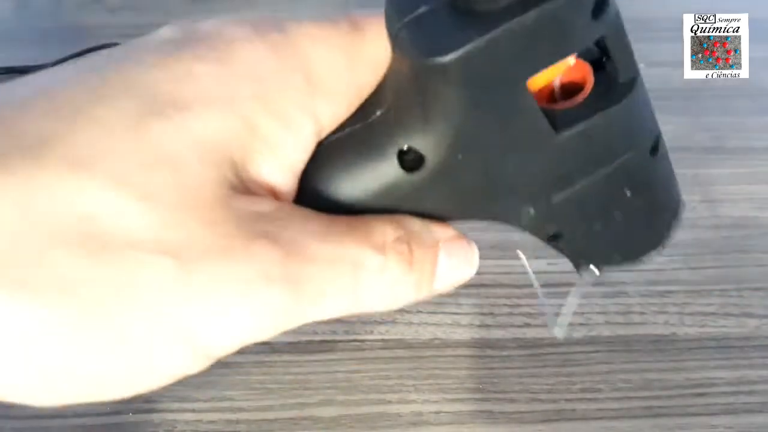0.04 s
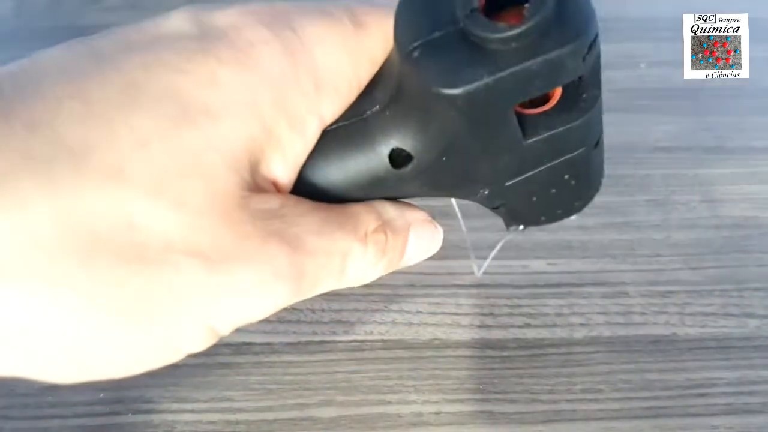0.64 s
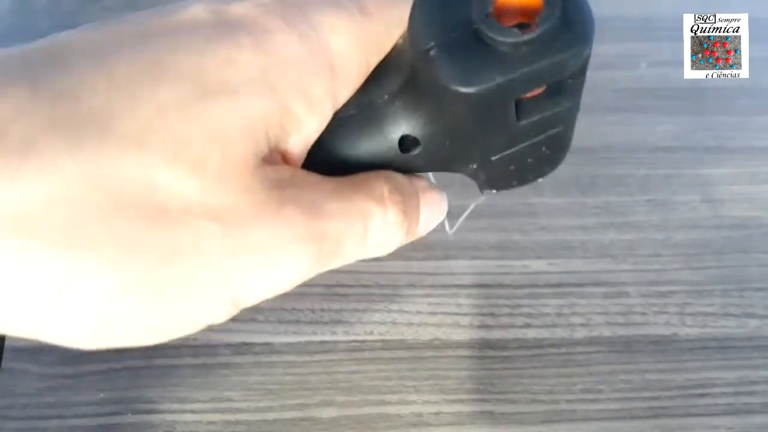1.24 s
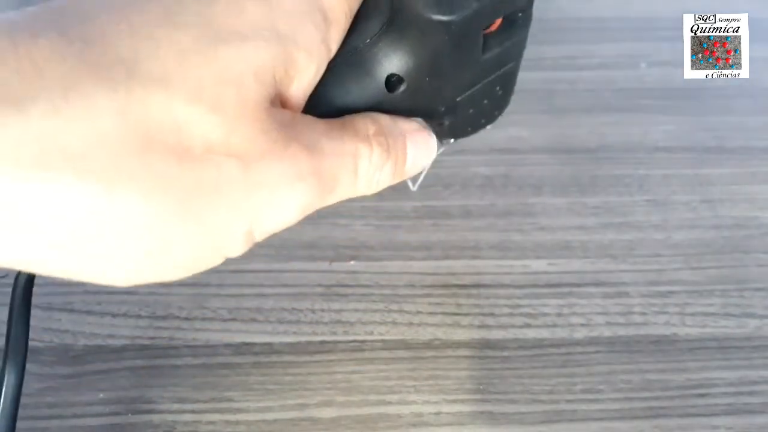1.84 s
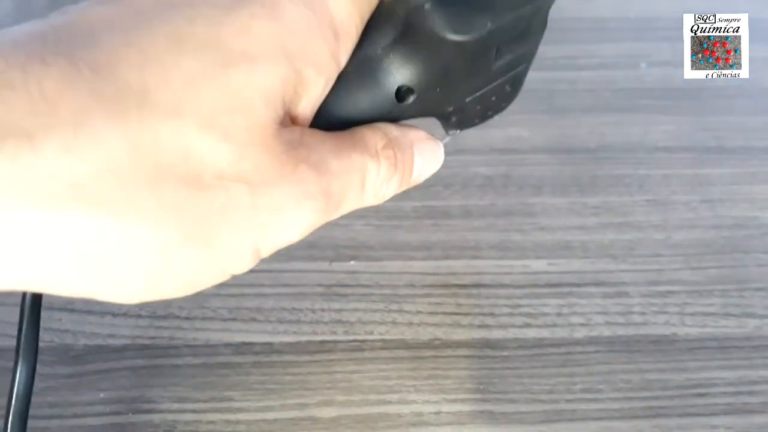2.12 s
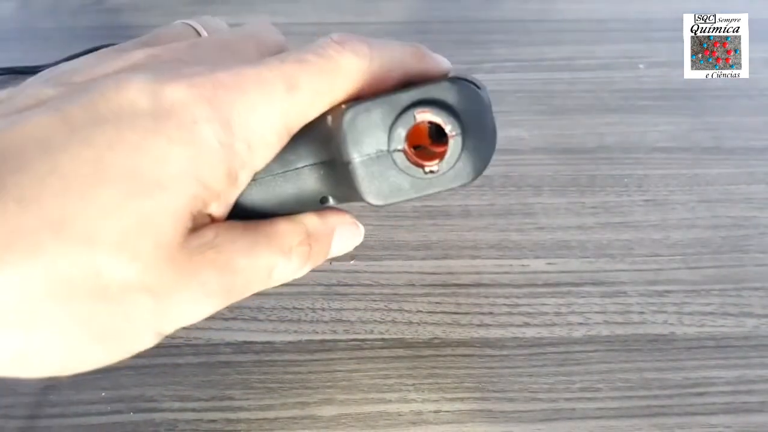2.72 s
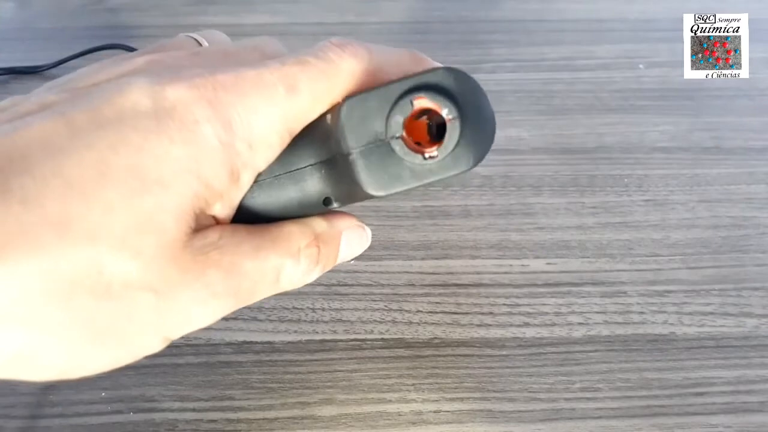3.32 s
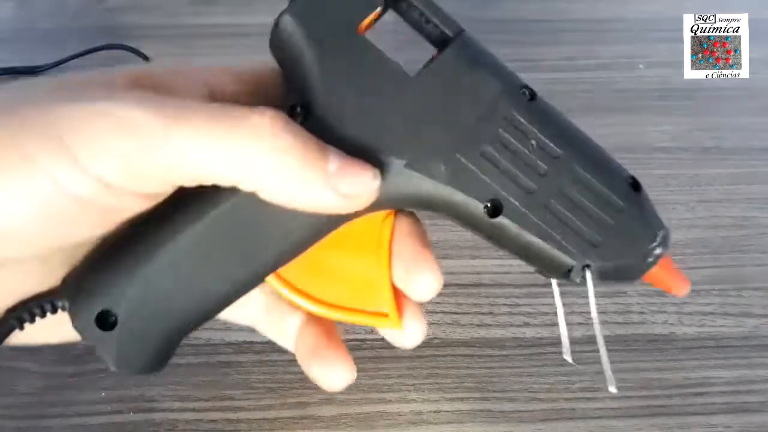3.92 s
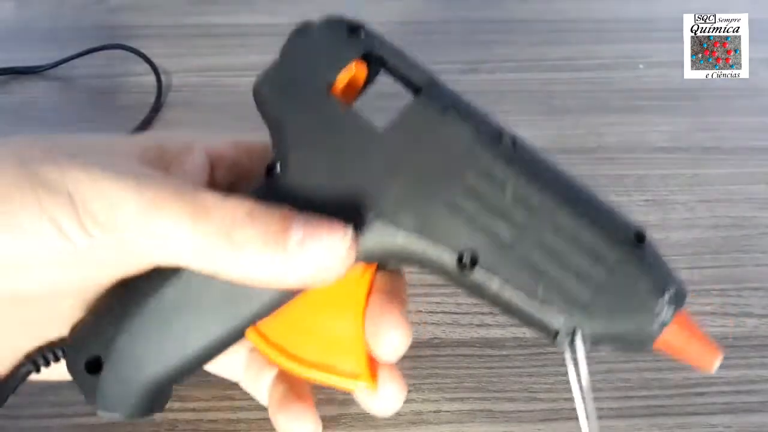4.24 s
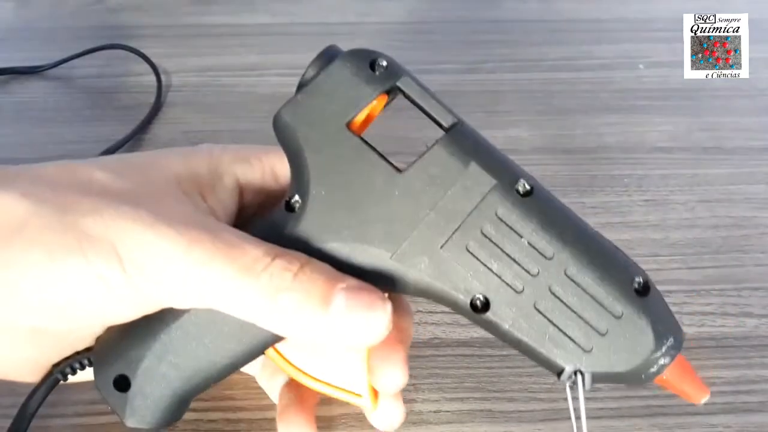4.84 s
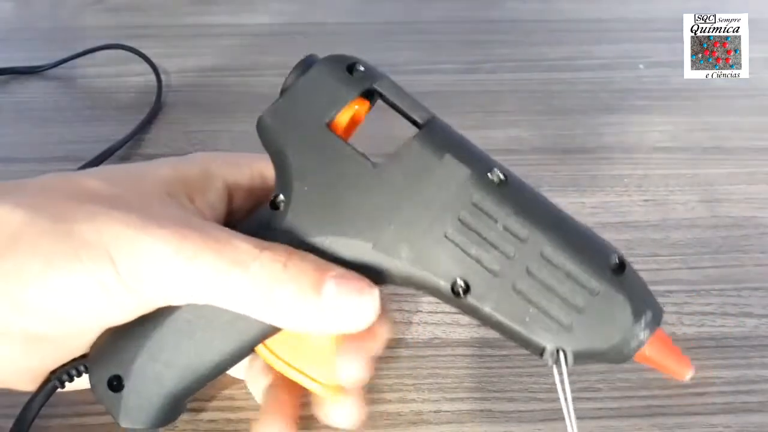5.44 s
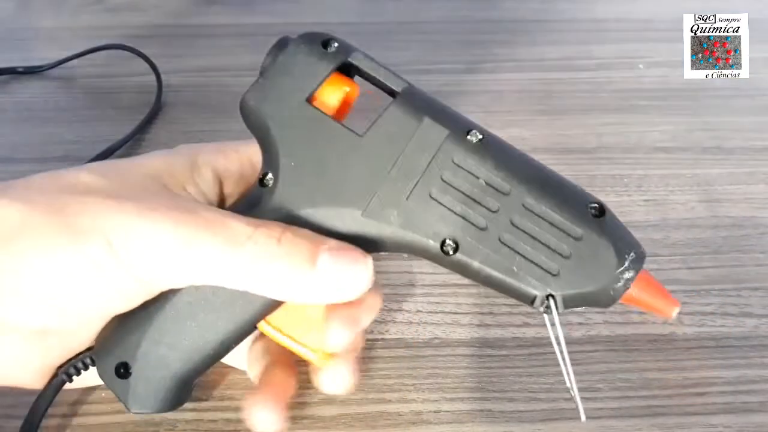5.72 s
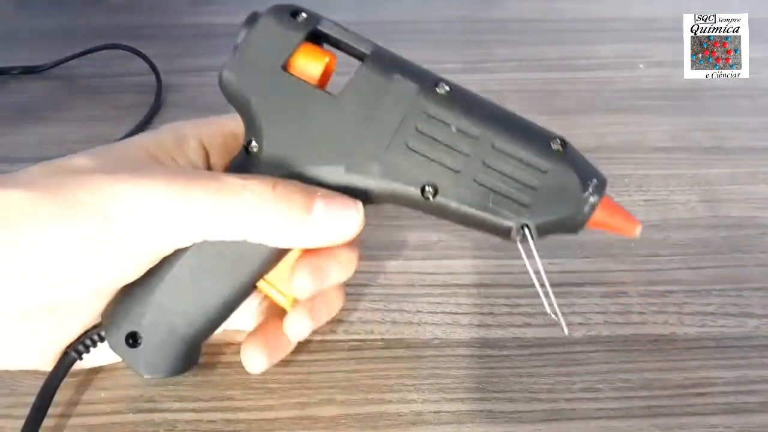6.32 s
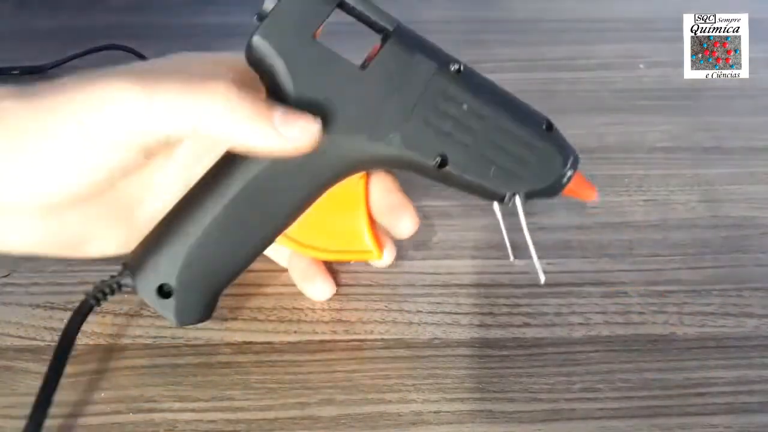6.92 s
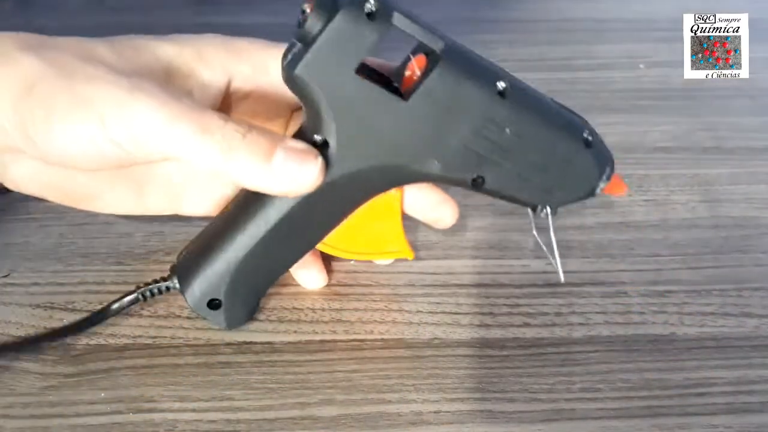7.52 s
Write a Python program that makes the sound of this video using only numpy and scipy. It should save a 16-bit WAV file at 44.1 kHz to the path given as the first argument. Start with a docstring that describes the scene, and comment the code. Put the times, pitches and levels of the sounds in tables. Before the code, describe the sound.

Close, hollow plastic scrapes and clicks from a glue gun trigger grow busier, ending in knocks and thuds on a wooden table.

```python
"""A plastic glue gun is worked close to the microphone in a small room, over a faint rumble.
Up to 6.7 s each squeeze and release scrapes the feed slider through the hollow shell, and the linkage
clacks at its stops. From 4.5 s the strokes crowd together, with more trigger cracks and spring pings.
From 6.9 s the gun is set down on a wooden table: it knocks, thumps hollowly, drags and thuds."""
import sys
import numpy as np
from scipy import signal
from scipy.fft import rfft, irfft, next_fast_len
from scipy.io import wavfile
from scipy.ndimage import uniform_filter1d

SR = 44100
rng = np.random.default_rng(int(sys.argv[2]) if len(sys.argv) > 2 else 0)


def transcribe(signal):
    """Save signal, clipped to [-1, 1], as a 16-bit WAV file at the path in sys.argv[1]."""
    frames = np.atleast_2d(signal).T
    limited = np.clip(frames, -1, 1)
    pcm = np.round(limited * 32767).astype(np.int16)
    wavfile.write(sys.argv[1], SR, pcm)


N = 337806

# All table levels are relative; gains follow.
# room noise spectrum: f/Hz, level/dB
NOISE_SPECTRUM = [(15, -49), (25, -11), (54, -2), (86, 1), (120, 1.5), (176, -7), (572, -18), (617, -18),
                  (720, -16.5), (1230, -22), (1520, -24), (1770, -24), (5300, -26.5), (6700, -32.5),
                  (8800, -33), (9610, -32), (11500, -49), (15000, -88), (22000, -120)]
# room noise, side over mid: f/Hz, gain/dB
NOISE_SIDE = [(60, -21.5), (170, -16), (490, -12), (1390, -7), (3980, -5), (11400, 1.5)]
# room reverberation: f/Hz, T60/s, gain/dB
REVERB = [(60, 0.39, -25), (137, 0.48, -14), (330, 0.52, -2.5), (780, 0.31, -2.5), (1850, 0.29, 3),
          (4640, 0.28, 1.5), (9400, 0.27, 0)]
# reverberation, side over mid: f/Hz, gain/dB
REVERB_SIDE = [(100, -43), (600, -18), (1400, -16), (2800, -12), (5500, -6), (9000, -4)]
# microphone response: f/Hz, gain/dB
MIC_RESPONSE = [(20, -5), (50, 0), (6500, 0), (8000, 1), (8800, 1), (9300, -2), (10000, -6), (11500, -10)]

# table top with the gun on it: f/Hz, width/Hz, level/dB
TABLE_MODES = [(90, 2.3, 0), (145.3, 15.7, 6), (176, 9.8, -14), (295, 9.5, -13.5), (346, 32, -8.5),
               (437, 140, -9), (517, 320, -16.5), (662, 80, -9), (810, 130, -19.5), (967, 150, -7),
               (1234, 220, -4), (1390, 310, -14.5), (1740, 830, -9.5), (1990, 250, -46), (2450, 290, -34),
               (3040, 250, -66), (4000, 1170, -15.5), (5800, 540, -34), (8060, 500, -35)]
# edges of its boom, thud, knock and click bands: f/Hz
TABLE_EDGES_HZ = [70, 240, 900, 3000, 9300]
# hand, cord and stand dragging on the table: peak t/s, length/s, level/dB, tilt/dB
RUBS = [(2.46, 0.058, -70.5, -3), (3.72, 0.1, -68.5, -3.5), (5.035, 0.035, -60.5, -7.5),
        (6.85, 0.95, -79.5, 19), (7.02, 0.16, -60, 6.5), (7.165, 0.32, -51.5, -2),
        (7.425, 0.21, -48.5, -3.5), (7.454, 0.018, -42.5, 4.5), (7.62, 0.71, -56.5, -3.5)]
# blows on the table: t/s, level/dB, tilt/dB, extra thud/dB, extra click/dB
KNOCKS = [(6.9516, -37, 1, -14, 5), (6.9859, -37.5, 2.5, 0, -3), (7.0207, -51, 5, -13, -5),
          (7.0488, -49.5, -3.5, -12, -12), (7.0697, -43, -3, -4, -1), (7.1254, -60, -1, -6, -8),
          (7.1426, -48.5, 2, -15, 3.5), (7.163, -45, 3.5, -7, 0), (7.3241, -39, -5, 13.5, 7),
          (7.3464, -46, -6, 8, 6.5), (7.499, -28, 0, 7.5, 2.5), (7.535, -49.5, 1, 17.5, -7),
          (7.558, -43.5, -2.5, 2, -6)]
# hollow thump of the gun landing flat, ringing in table and room: f/Hz, width/Hz, level/dB
THUMP_MODES = [(277, 20, -12), (328, 21, -1.5), (373, 44, 1), (406.5, 14.4, -5), (480, 23, -2.5),
               (541, 23, -1), (615, 60, -4.5), (693, 25, 1), (744, 18, -1), (811, 25, -4), (1096, 27, -18),
               (1370, 110, -9)]
# gun landing flat: t/s, level/dB
THUMPS = [(7.324, -27), (7.3464, -33)]

# gun shell: f/Hz, width/Hz, level/dB
SHELL_MODES = [(650, 21, -17), (825, 118, 18.5), (800, 93, 11), (1019, 85, 8.5), (1220, 220, -4),
               (1900, 300, 1), (2060, 640, -2.5), (2450, 1500, -2.5), (3040, 130, -3.5), (3550, 850, -3.5),
               (4600, 450, -22.5), (5160, 5400, -21.5), (7120, 420, -15), (7260, 950, -6.5),
               (7760, 750, -1.5), (8750, 200, -34)]
# edges of its body, rasp and hiss bands: f/Hz
SHELL_EDGES_HZ = [560, 1450, 5500, 10800]
# rubbing contacts singing in one resonance: centre t/s, length/s, f/Hz, width/Hz, level/dB
FRICTION_TONES = [(0.06, 0.049, 780, 170, -58.5), (0.146, 0.075, 2200, 800, -62.5),
                  (0.278, 0.019, 800, 40.3, -47.5), (0.282, 0.067, 7790, 700, -64),
                  (0.641, 0.062, 1947, 590, -59), (0.86, 0.075, 845, 90, -61.5),
                  (1.129, 0.13, 1170, 60, -77), (1.31, 0.13, 2426, 300, -66.5),
                  (1.575, 0.034, 834, 45, -49.5), (1.65, 0.15, 825, 90, -68), (2.151, 0.083, 684, 192, -63),
                  (2.7, 0.14, 810, 101, -81), (2.716, 0.095, 5810, 720, -74.5), (2.915, 0.04, 824, 60, -70),
                  (3.145, 0.12, 817, 81, -68.5), (3.149, 0.11, 5660, 600, -74),
                  (3.347, 0.12, 2450, 502, -69), (3.364, 0.041, 800, 55, -56.5),
                  (3.44, 0.11, 810, 103, -65.5), (3.679, 0.33, 910, 229, -75), (3.739, 0.12, 591, 169, -69),
                  (4.855, 0.039, 780, 90, -50), (5.044, 0.056, 218, 50, -61),
                  (5.045, 0.079, 1530, 402, -63.5), (5.19, 0.11, 829, 166, -57),
                  (5.394, 0.025, 874, 260, -54.5), (5.5, 0.063, 903, 380, -57),
                  (6.238, 0.1, 3490, 534, -65), (6.434, 0.03, 8400, 1100, -63),
                  (7.087, 0.047, 142, 30, -43.5), (7.164, 0.06, 1135, 381, -44),
                  (7.168, 0.045, 2050, 720, -59), (7.19, 0.11, 149, 50, -52.5),
                  (7.439, 0.1, 3544, 1508, -51)]
# spring: f/Hz, width/Hz, level/dB
SPRING_MODES = [(4550, 110, -9.5), (5600, 240, -9), (6500, 290, 0), (7770, 140, -7)]
# spring coming free: t/s, level/dB
PINGS = [(2.3303, -59.5), (4.8132, -53.5), (5.352, -50)]
# trigger bottoming out: t/s, level/dB, tilt/dB, extra crack/dB
SNAPS = [(0.0985, -44, -0.5, 7), (0.1072, -42.5, 3, -1), (4.4958, -38.5, 10, 1), (4.5003, -45.5, 2, 0),
         (4.5112, -42, 5, -4), (5.2358, -44.5, -5, -1.5), (5.4154, -48, -1.5, 5), (5.5608, -44.5, 0, 1),
         (5.6778, -34.5, 7, -5.5), (5.8388, -45, 4, 0), (6.2655, -33.5, 0.5, 0), (6.2692, -54, 21.5, 8.5),
         (6.3102, -45.5, 2, -4), (6.5, -37.5, -0.5, -1.5), (6.5421, -42.5, -0.5, -8),
         (6.5485, -40.5, -2.5, -2.5)]
# linkage catches, stops and rebounds: t/s, level/dB, tilt/dB, extra crack/dB
CLACKS = [(0.0525, -62.5, -7, 6.5), (0.227, -62, -2.5, 1.5), (0.622, -51.5, -1, -6), (0.633, -61.5, 1, 5),
          (0.646, -66, -3, -7), (0.7615, -60, 8, 7.5), (1.3492, -66.5, -15, -2),
          (1.4277, -60.5, -11.5, 4.5), (1.553, -63.5, -8, 4.5), (1.8735, -74, -20, 3),
          (1.9576, -62.5, -11.5, 1.5), (1.976, -66.5, -5, 5), (2.047, -69, -2, 5), (2.084, -59, 4, -7),
          (2.1009, -61.5, -9, -5), (2.125, -57, -4.5, -3), (3.1806, -63.5, -7.5, 1.5), (3.301, -74, 4, 12),
          (3.426, -53, 5, -3.5), (4.4975, -42, -5.5, -5.5), (4.5225, -54.5, 10, 8), (4.8755, -57, -10, 3),
          (4.8795, -54.5, -3, 7), (4.8875, -65, 1, -3), (4.8965, -50, -4, -6), (4.9055, -59, -8, -14),
          (4.969, -62.5, -7.5, -14), (5.1245, -61, -11, -5), (5.155, -66, -21.5, 7),
          (5.2417, -56, 7.5, 9.5), (5.3735, -53.5, -7.5, -13), (5.4088, -53, -6.5, 5), (5.421, -55, -1, 0),
          (5.5545, -52, -10, -1.5), (5.5921, -50, 2, -4), (5.8455, -52.5, -9, -1.5), (5.8585, -61, 14, -10),
          (5.8758, -59, -2, -2), (6.006, -72.5, -15, 2), (6.2132, -60.5, -5, 4.5), (6.2935, -47, 4, -22),
          (6.4207, -56.5, -4, -10), (6.461, -56.5, -2, 5), (6.504, -54, -2, -6)]
# finger-driven slider strokes: peak t/s, length/s, level/dB, tilt/dB
PUSHES = [(0.095, 0.18, -56, 2.5), (0.638, 0.16, -61, 2), (1.41, 0.17, -60, 3), (1.94, 0.18, -61.5, 4.5),
          (2.725, 0.25, -69, 6.5), (3.17, 0.17, -65, 5.5), (4.19, 0.11, -68, 4), (4.48, 0.25, -60, -2),
          (5.152, 0.049, -64.5, -13), (5.23, 0.12, -55.5, -1), (5.54, 0.2, -55.5, -1.5),
          (5.845, 0.16, -56, 1), (6.265, 0.13, -52.5, 0), (6.49, 0.22, -53.5, 3.5)]
# spring-driven slider strokes: peak t/s, length/s, level/dB, tilt/dB
RETURNS = [(0.282, 0.074, -58.5, -0.5), (0.799, 0.082, -53.5, -1.5), (1.007, 0.096, -75, -4.5),
           (1.573, 0.18, -62.5, 0), (2.105, 0.085, -58.5, 1.5), (2.346, 0.12, -72, 5),
           (2.909, 0.12, -68.5, 2.5), (3.378, 0.17, -61.5, 0), (4.854, 0.11, -57, -1.5),
           (5.383, 0.097, -53.5, -1), (5.706, 0.13, -57, -0.5), (6.57, 0.11, -58.5, 2)]
# coupling of slider and spring to the shell: f/Hz, gain/dB
SLIDER_RESPONSE = [(500, -0.5), (850, 0), (1150, 0), (1600, -7), (2000, 0), (2220, -0.5), (2480, 0.5),
                   (3000, -1.5), (3900, 1.5), (4800, 3.5), (6300, -0.5), (8200, -2.5)]

RUB_DB, KNOCK_DB = (1, 1, 0.5, -5), (4, -7, -0.5, -13)  # boom, thud, knock, click
CLACK_DB, PUSH_DB, RETURN_DB = (1.5, 0.5, -13.5), (6.5, -4, -8.5), (4.5, -1, 0)  # body, rasp, hiss


def amp(db):
    return 10 ** (np.asarray(db) / 20)


def unit_rms(x):
    return x / np.sqrt(np.mean(x ** 2) + 1e-20)


def interp_log(points, hz):
    f, value = np.transpose(points)
    return np.interp(np.log(hz + 1), np.log(f + 1), value)


def colour(x, points):
    """Filter by a curve of f/Hz, gain/dB."""
    size = next_fast_len(len(x))
    gain = amp(interp_log(points, np.fft.rfftfreq(size, 1 / SR)))
    return irfft(rfft(x, size) * gain, size)[:len(x)]


def add(mix, start_s, sound):
    part = mix[max(round(start_s * SR), 0):][:len(sound)]
    part += sound[:len(part)]


def band_levels(shape_db, level_db, tilt_db):
    """Levels in dB, low band to high; harder contact tilts towards the treble."""
    return level_db + np.array(shape_db) + tilt_db * np.linspace(-1, 1, len(shape_db))


def strokes(rows, shape_db, rise_share):
    """Rows for scrape(): peak t/s, rise/s, fall/s, band levels/dB."""
    return [(s, rise_share * length_s, (1 - rise_share) * length_s, band_levels(shape_db, db, tilt))
            for s, length_s, db, tilt in rows]


def room_noise(level_db=-68.5, waver_db=1.7):
    """Wavering rumble and faint hiss: mid, side."""
    drift = unit_rms(uniform_filter1d(uniform_filter1d(rng.standard_normal(N), 5000), 3000))
    gain = amp(level_db + waver_db * drift)
    mid, side = (gain * unit_rms(colour(rng.standard_normal(N), NOISE_SPECTRUM)) for _ in range(2))
    return mid, colour(side, NOISE_SIDE)


def reflections(onset_s=0.00036, taps_per_s=3000):
    """Room impulse response: sparse echoes build up, then decay band by band."""
    size, bands = SR // 2, np.array(REVERB)
    taps = rng.standard_normal(size) * (rng.random(size) < taps_per_s / SR)
    hz, t, spectra = signal.stft(taps, SR, nperseg=256)
    t60_s = interp_log(bands[:, :2], hz)[:, None]
    tail = signal.istft(spectra * amp(-60 * t / t60_s), SR, nperseg=256)[1][:size]
    tail *= 1 - np.exp(-(np.arange(size) / SR / onset_s) ** 2)
    return colour(tail / np.linalg.norm(tail), bands[:, ::2])


def room_reverb(x, patterns=4, cycle_s=1.4):
    """The hand moves the gun about: reflection patterns cross-fade in turn."""
    turns = np.arange(N) / SR / cycle_s + np.arange(patterns)[:, None] / patterns
    shares = np.maximum(np.cos(2 * np.pi * turns), 0)
    shares /= np.linalg.norm(shares, axis=0)
    return sum(signal.oaconvolve(x * share, reflections())[:N] for share in shares)


def tap_response(modes, edges_hz, size, vary_db, detune, phase_rad):
    """Damped modes, split into bands; each contact point weights them differently."""
    t = np.arange(size) / SR
    hz, width_hz, db = np.transpose(modes)[:, :, None]
    weight, shift, phase = rng.standard_normal((3, len(modes), 1))
    upper = hz > edges_hz[1]  # lowest band keeps pitch and phase
    angle = 2 * np.pi * hz * (1 + detune * shift * upper) * t + phase_rad * phase * upper
    envelopes = amp(db + vary_db * weight) * width_hz * np.exp(-np.pi * width_hz * t)
    tap = np.sum(envelopes * np.cos(angle), axis=0)
    return [signal.sosfilt(signal.butter(3, band_hz, "bandpass", fs=SR, output="sos"), tap)
            for band_hz in zip(edges_hz, edges_hz[1:])]


def strike(rows, body, chatter, chatter_s, rise_s, low_lag_s=0):
    """One impulse per blow; the faces then chatter, roughening the upper bands."""
    out, t = np.zeros(N), np.arange(SR // 30) / SR
    for s, levels_db in rows:
        rattle = chatter * rng.standard_normal(len(t)) * np.exp(-t / chatter_s)
        contact_s = rise_s * np.sqrt(amp(max(levels_db) - levels_db[-1]))  # dull blows rise slower
        for k, (db, band) in enumerate(zip(levels_db, body())):
            roughness = k / (len(levels_db) - 2)
            blow = band + roughness * signal.fftconvolve(band, rattle)[:len(band)]
            blow *= 1 - np.exp(-np.arange(len(blow)) / SR / contact_s)
            attack_rms = np.sqrt(np.mean(blow[:SR // 100] ** 2))
            add(out, s + low_lag_s * (k == 0), amp(db) * blow / attack_rms)
    return out


def scrape(rows, body, slips_per_s, uneven_db, grit, jerk_db):
    """Stick-slips ring the body as speed swells, jerks and dies; grit fills the top band."""
    out, t = np.zeros(N), np.arange(-SR // 3, SR // 3) / SR
    for s, rise_s, fall_s, levels_db in rows:
        jerks = unit_rms(uniform_filter1d(rng.standard_normal(len(t)), 300))
        speed = np.exp(-2 * abs(t / np.where(t < 0, rise_s, fall_s)) ** 1.83) * amp(jerk_db * jerks)
        sizes = amp(uneven_db * np.minimum(rng.exponential(1, len(t)), 3))
        signs = rng.choice([-1, 1], len(t))
        slips = unit_rms(sizes * signs * (rng.random(len(t)) < slips_per_s / SR))
        grains = grit * rng.standard_normal(len(t))
        start_s = s + t[0]
        for k, (db, band) in enumerate(zip(levels_db, body())):
            force = speed * (slips + grains * (k == len(levels_db) - 1))
            sound = signal.fftconvolve(force, band)
            sound *= amp(db) * np.sqrt(np.sum(speed ** 2) / np.sum(sound ** 2))
            add(out, start_s, sound[max(-round(start_s * SR), 0):])
    return out


def free_ring(rows, modes, rise_s):
    """A strike sets the modes ringing freely."""
    out, t = np.zeros(N), np.arange(16384) / SR
    hz, width_hz, db = np.transpose(modes)[:, :, None]
    envelopes = amp(db) * np.exp(-np.pi * width_hz * t)
    for s, level_db in rows:
        sound = np.sum(envelopes * np.sin(2 * np.pi * (hz * t + rng.random(hz.shape))), axis=0)
        sound *= 1 - np.exp(-t / rise_s)
        attack_rms = np.sqrt(np.mean(sound[:SR // 100] ** 2))
        add(out, s, amp(level_db) * sound / attack_rms)
    return out


def table_top():
    """One contact on the wood."""
    return tap_response(TABLE_MODES, TABLE_EDGES_HZ, 8192, vary_db=3.0, detune=0.0019, phase_rad=0.88)


def table_drag():
    """Hand, cord and stand rub over the table."""
    rubs = strokes(RUBS, RUB_DB, rise_share=0.61)
    return scrape(rubs, table_top, slips_per_s=1200, uneven_db=3.0, grit=9.5, jerk_db=0.5)


def table_knocks():
    """The gun lands: a flat face adds thud, a hard corner adds click."""
    blows = [(s, band_levels(KNOCK_DB, db, tilt) + [0, thud, 0, click])
             for s, db, tilt, thud, click in KNOCKS]
    return strike(blows, table_top, chatter=0.16, chatter_s=0.0082, rise_s=0.00006, low_lag_s=0.0026)


def shell():
    """One contact on the hollow plastic shell."""
    return tap_response(SHELL_MODES, SHELL_EDGES_HZ, 2048, vary_db=-0.5, detune=0.02, phase_rad=1.0)


def gripped_shell(damping_hz=280):
    """The squeezing hand damps the shell, widening every mode."""
    modes = np.array(SHELL_MODES) + [0, damping_hz, 0]
    return tap_response(modes, SHELL_EDGES_HZ, 2048, vary_db=9.0, detune=0.011, phase_rad=0.5)


def slider_squeak(centre_s=1.239, length_s=0.19, level_db=-58.5, top_s=1.225, top_hz=2606, sag_hz=311):
    """Faint, near-pure tone; pitch and level arch."""
    out, size, start_s = np.zeros(N), int(length_s * SR), centre_s - length_s / 2
    from_top = (start_s + np.arange(size) / SR - top_s) / (length_s / 2)
    wobble = 1 + 0.005 * unit_rms(uniform_filter1d(rng.standard_normal(N), 150))[:size]
    hz = (top_hz - sag_hz * from_top ** 2) * wobble
    tone = np.sqrt(2) * np.sin(2 * np.pi * np.cumsum(hz) / SR)
    add(out, start_s, amp(level_db) * signal.windows.hann(size) * tone)
    return out


def friction_tones(sag_widths=0.57, shell_hz=804, shell_width_hz=58.5, rasp_hz=8070, rasp_width_hz=1100):
    """Friction noise in one sinking resonance. Each return adds a hollow note and a spring rasp."""
    out, notes, rasps = np.zeros(N), [], []
    for s, length_s, db, tilt in RETURNS:
        body_db, _, hiss_db = band_levels(RETURN_DB, db, tilt)
        notes.append((s + 0.007446, 0.86 * length_s, shell_hz, shell_width_hz, body_db - 8))
        rasps.append((s, 0.61 * length_s, rasp_hz, rasp_width_hz, hiss_db - 10.5))
    for s, length_s, hz, width_hz, db in FRICTION_TONES + notes + rasps:
        size = min(int(length_s * SR), SR // 4)
        noise = rng.standard_normal((SR // 4, 2)) @ [1, 1j]
        fuzz = signal.sosfilt(signal.butter(2, width_hz / 2, fs=SR, output="sos"), noise)[-size:]
        glide_hz = hz - sag_widths * width_hz * np.linspace(-.5, .5, size)
        carrier = np.exp(2j * np.pi * np.cumsum(glide_hz) / SR)
        add(out, s - length_s / 2, amp(db) * unit_rms((fuzz * carrier).real * signal.windows.cosine(size)))
    return out


def stops(rows):
    """Rows for strike(): t/s, band levels/dB. Edge-on hits add crack in the rasp band."""
    return [(s, band_levels(CLACK_DB, db, tilt) + [0, crack, 0]) for s, db, tilt, crack in rows]


def trigger_snaps():
    """The trigger bottoms out under a tight grip: a dry crack."""
    return strike(stops(SNAPS), gripped_shell, chatter=0.23, chatter_s=0.0038, rise_s=0.00013)


def linkage_clacks():
    """The linkage hits its stops and rings the shell."""
    return strike(stops(CLACKS), shell, chatter=0.2, chatter_s=0.003, rise_s=0.00045)


def feed_slider():
    """Slider scrapes the shell: pushes swell towards the stop, returns start fast and hiss more."""
    slides = strokes(PUSHES, PUSH_DB, rise_share=0.65) + strokes(RETURNS, RETURN_DB, rise_share=0.39)
    scraping = scrape(slides, shell, slips_per_s=1400, uneven_db=2.0, grit=6.3, jerk_db=1.56)
    return colour(scraping, SLIDER_RESPONSE)


def scene():
    """Direct sound centred; only the room gives width."""
    slider = amp(-4.0) * feed_slider()
    linkage = amp(-4.0) * linkage_clacks()
    linkage += amp(-4.5) * free_ring(PINGS, SPRING_MODES, rise_s=0.00041)
    snaps = amp(-8.0) * trigger_snaps()
    knocks = amp(-1.5) * table_knocks()
    thumps = free_ring(THUMPS, THUMP_MODES, rise_s=0.00092)
    drag = amp(-2.5) * table_drag()
    tones = friction_tones() + slider_squeak()
    send = (amp(-4.5) * slider + amp(-7.5) * tones + amp(-3.0) * linkage
            + amp(-6.0) * (snaps + knocks + drag) + amp(-10.5) * thumps)
    noise_mid, noise_side = room_noise()
    mid = slider + linkage + snaps + knocks + thumps + drag + tones + room_reverb(send) + noise_mid
    side = colour(signal.oaconvolve(send, reflections())[:N], REVERB_SIDE) + noise_side
    return np.array([mid + side, mid - side])


def record(dry):
    """Microphone response, then an 11.3 kHz low-pass."""
    heard = np.array([colour(channel, MIC_RESPONSE) for channel in dry])
    lowpass = signal.firwin(161, 11300, window=("kaiser", 9), fs=SR)
    return signal.oaconvolve(heard, lowpass[None], "same")


dry = scene()
out = record(dry)
transcribe(out)
```